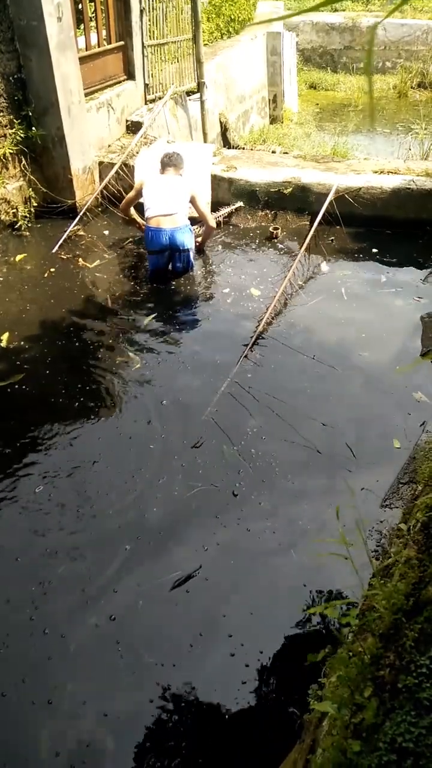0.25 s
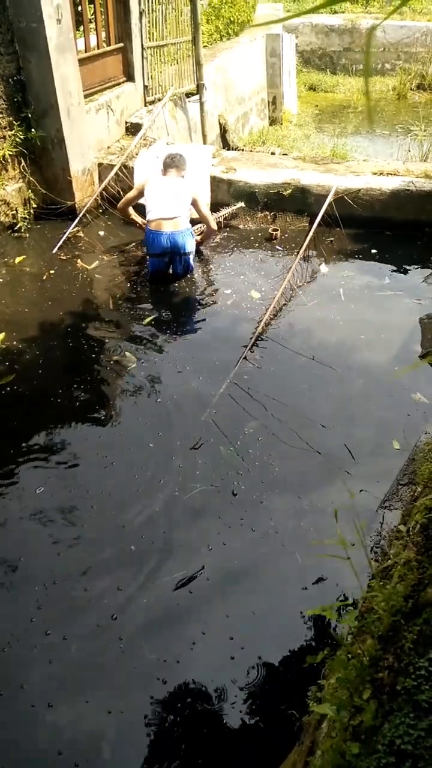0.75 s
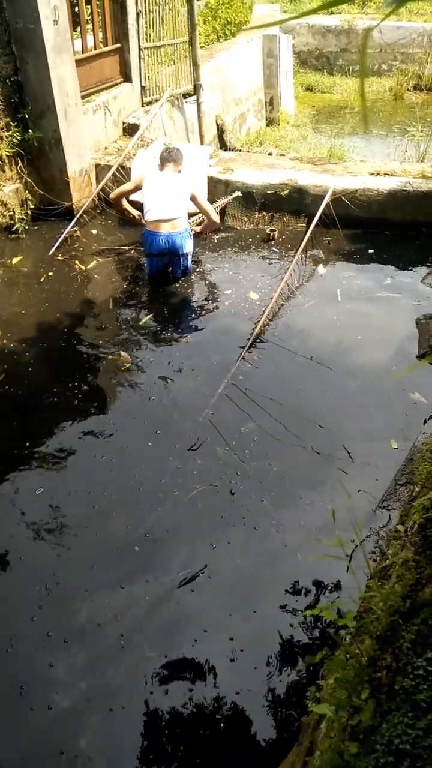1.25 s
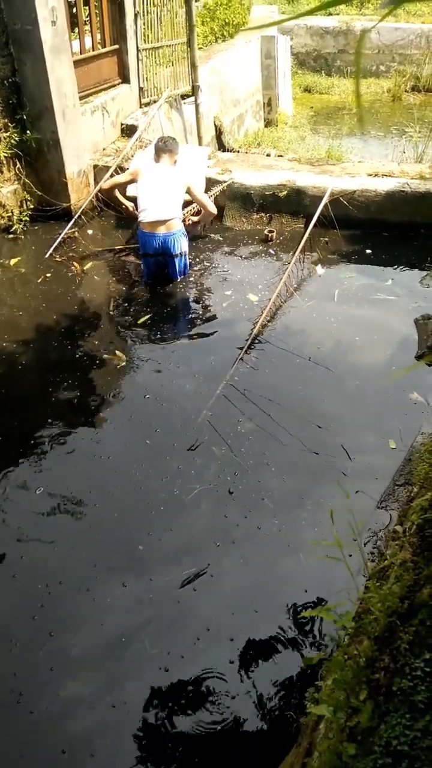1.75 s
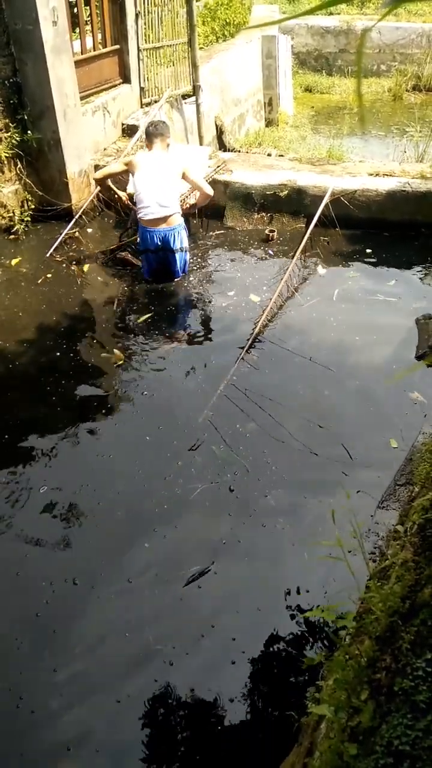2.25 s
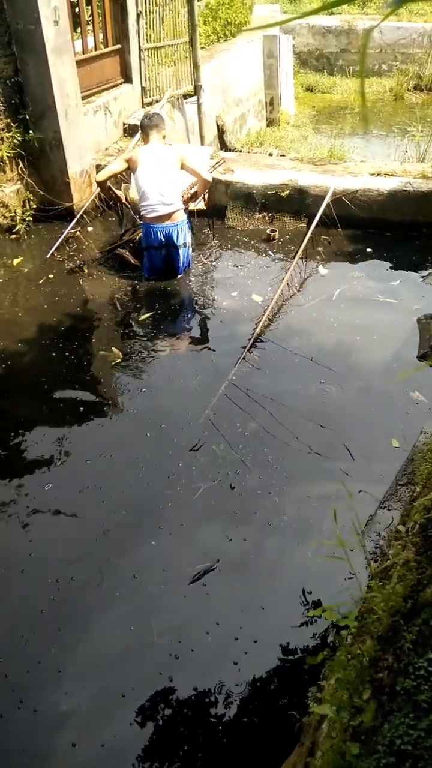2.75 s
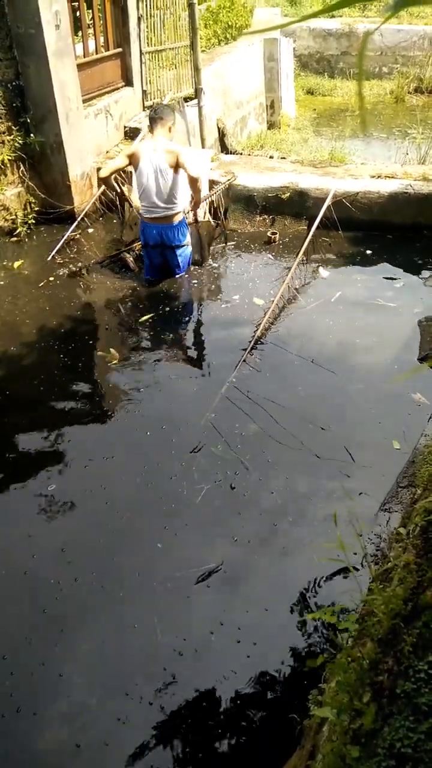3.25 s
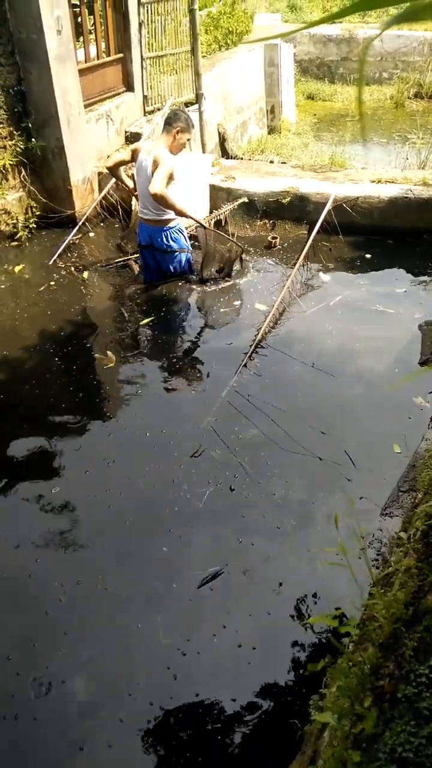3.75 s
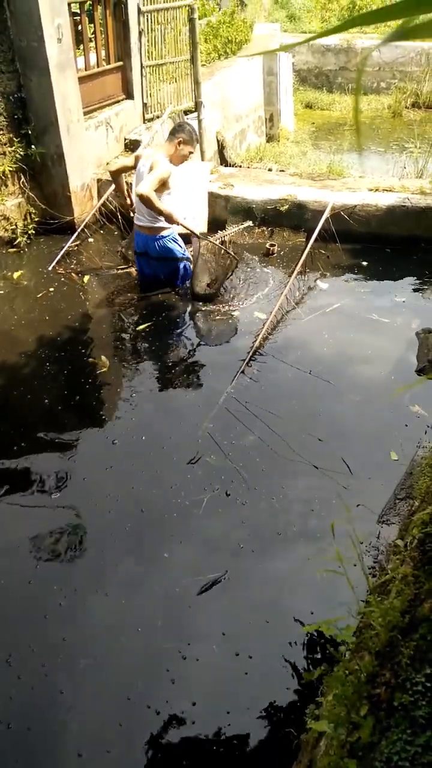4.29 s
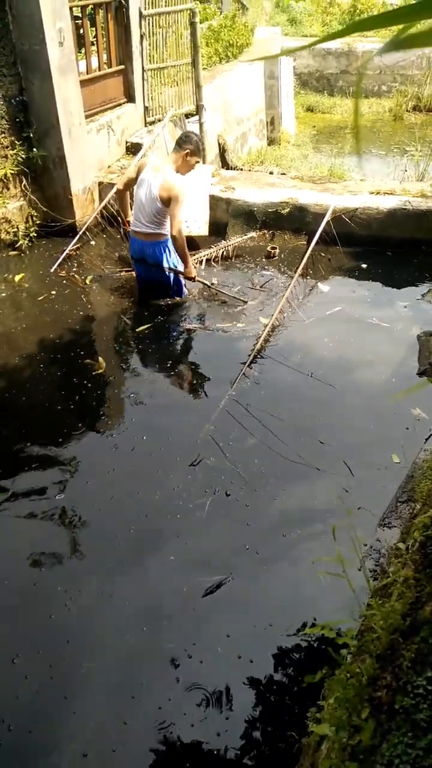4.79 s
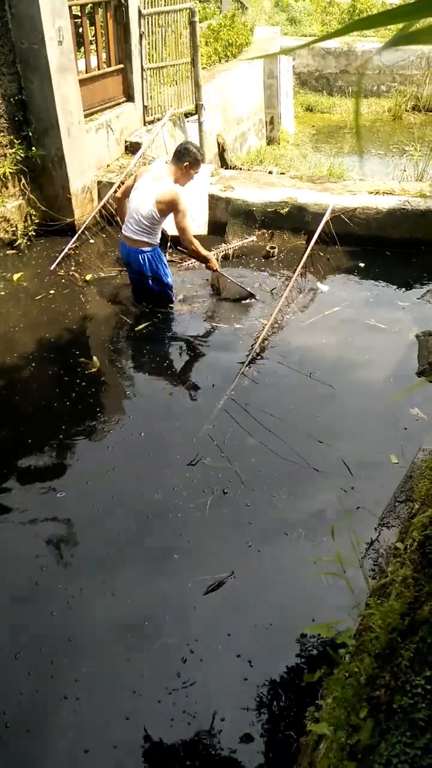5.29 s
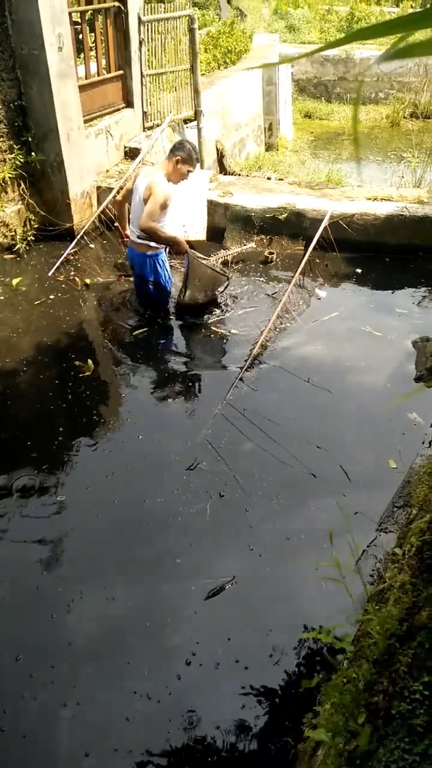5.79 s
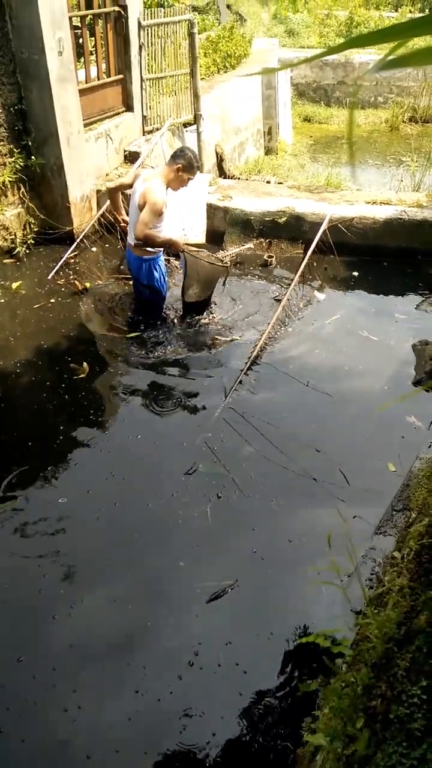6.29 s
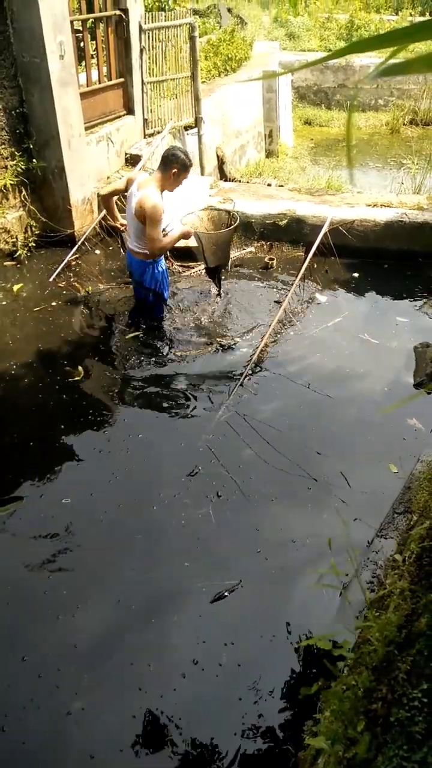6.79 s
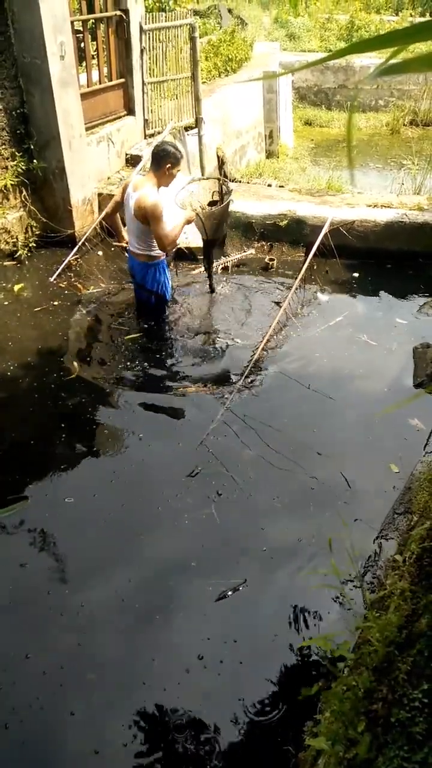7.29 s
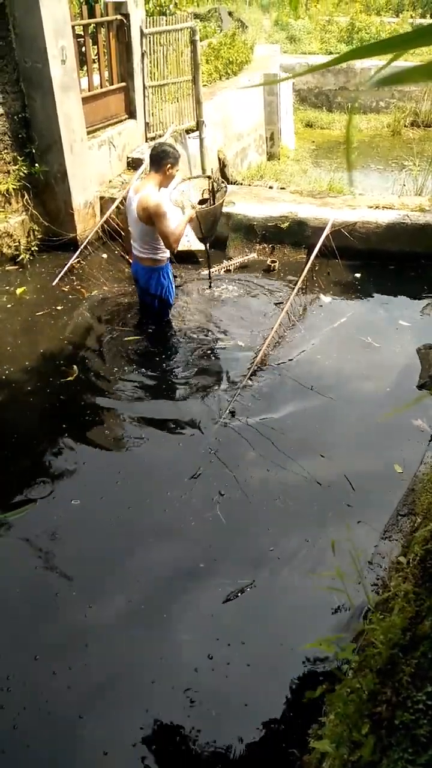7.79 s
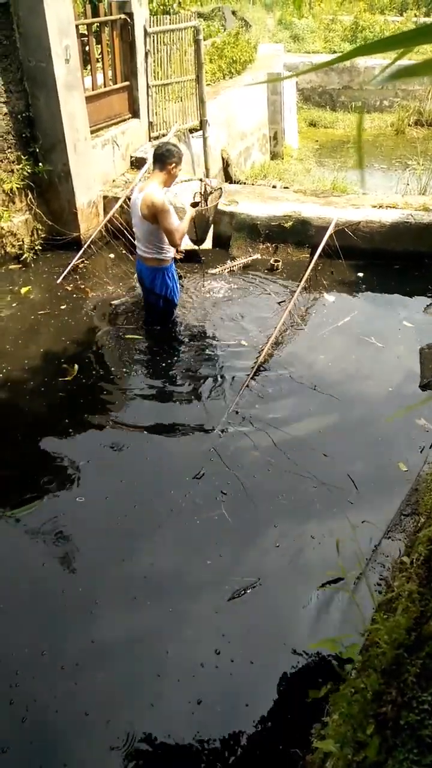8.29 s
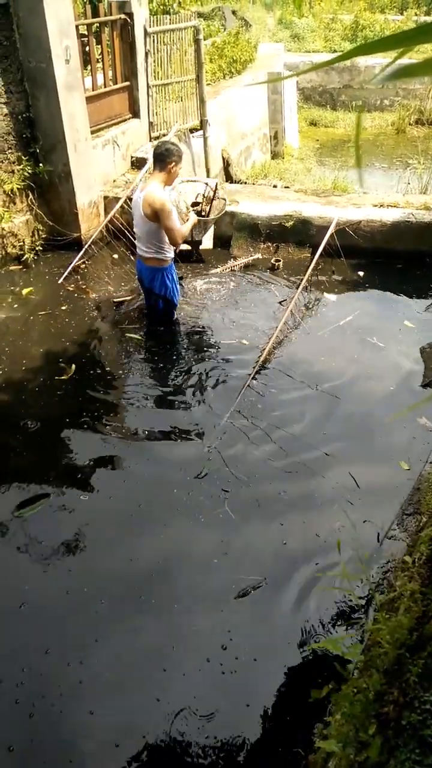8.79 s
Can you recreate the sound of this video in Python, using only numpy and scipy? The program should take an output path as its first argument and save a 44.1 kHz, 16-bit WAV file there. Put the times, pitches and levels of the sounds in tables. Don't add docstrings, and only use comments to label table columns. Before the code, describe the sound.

Cicadas hiss outdoors while a person wades in a pond, the net sloshing, twigs snapping, then a gulping scoop and pattering drips.

```python
import sys
import numpy as np
from scipy import signal
from scipy.fft import rfft, irfft, next_fast_len
from scipy.io import wavfile
from scipy.ndimage import uniform_filter1d, minimum_filter1d, map_coordinates

SR = 44100
rng = np.random.default_rng(int(sys.argv[2]) if len(sys.argv) > 2 else 0)


def volts_from_db(level):
    exponent = np.asarray(level, float) / 20
    return 10 ** exponent


def output_pcm(signal):
    pcm = np.clip(np.atleast_2d(signal).T, -1, 1) * 32767
    wavfile.write(sys.argv[1], SR, np.round(pcm).astype(np.int16))


N = 399105


def unit(x):
    return x / np.sqrt(np.mean(x ** 2) + 1e-20)


def along(points, hz):
    f, v = np.transpose(points)
    return np.interp(np.log(hz + 1), np.log(f + 1), v)


def curves(rows):
    s, *cols = np.transpose(rows)
    return [np.interp(np.arange(N) / SR, s, c) for c in cols]


def crests(base_db, rows):
    t = np.arange(N) / SR
    for s, db, climb, ebb in rows:
        base_db = np.maximum(base_db, db - np.maximum(climb * (s - t), ebb * (t - s)))
    return base_db


def wobble(rate):
    knots = rng.standard_normal(int(N * rate / SR) + 4)
    return map_coordinates(knots, [np.arange(N) * rate / SR])


def filtered(x, response):
    m = next_fast_len(x.shape[-1] + 8192)
    return irfft(rfft(x, m) * response(np.fft.rfftfreq(m, 1 / SR)), m)[..., :x.shape[-1]]


def spread(pair, lag):
    # frequency in Hz, likeness from 0 to 1.
    alike = [(60, 0.92), (300, 1), (700, 0.44), (1500, 0.56), (2800, 0.077), (4100, 0.21), (6500, 0.41),
             (8000, 0.12), (14000, 0.041)]

    def shares(hz):
        like = along(alike, hz)
        early = np.exp(2j * np.pi * hz * lag / SR)
        return np.array([like * early, np.sqrt(1 - like ** 2)])

    left = filtered(pair, shares).sum(0)
    return np.array([left, pair[0]])


def rush(spectrum, patchy_db, spiky=0.):
    noise = rng.standard_normal((2, N)) * volts_from_db(spiky * wobble(700))
    z = signal.stft(noise, nperseg=512)[2]
    field = uniform_filter1d(rng.standard_normal(z.shape[1:]), size=5, axis=0)
    field = uniform_filter1d(field, size=10, axis=1)
    pair = signal.istft(z * volts_from_db(patchy_db * unit(field)), nperseg=512)[1][:, :N]
    return unit(filtered(pair, lambda hz: volts_from_db(along(spectrum, hz))))


def rings(s, gain, hz, cycles, rise):
    t = np.arange(1600) / SR
    age = t * (hz / cycles)[:, None]
    envelope = np.exp(-3 * age) * (1 - np.exp(-14 * age))
    turn = 2 * np.pi * cycles[:, None] * (age + rise * age * age / 2)
    wave = gain[:, None] * envelope * np.sin(turn)
    at = (s * SR).astype(int)[:, None] + np.arange(len(t))
    return np.bincount(at.ravel(), wave.ravel(), N + len(t))[:N]


def tone(rows, orders, rough):
    hz, db = curves(rows)
    t = np.arange(N) / SR
    on = np.clip(np.minimum(t - rows[0][0], rows[-1][0] + 0.0063 - t) / 0.0031, 0, 1)
    turn = 2 * np.pi * np.cumsum(hz) / SR
    partials = sum(volts_from_db(g) * (1 + rough()) * np.sin(k * turn) for k, g in orders)
    return np.sqrt(2) * on * volts_from_db(db) * partials


def stirred_water():
    # frequency in Hz, level in dB per Hz.
    pond = [(150, -47), (250, -14), (441, 3.5), (720, -21), (875, -1.5), (1620, 5), (3560, -33),
            (4000, -17), (5200, -38), (8800, -120)]
    # frequency in Hz, level in dB per Hz.
    mesh = [(1200, -25.5), (2000, -4.5), (3000, -5.5), (5000, -10.5), (8000, -4.5), (11000, -17.5),
            (14500, -27)]
    # time in seconds, stirred water in dB, spray in dB.
    wading = [(0, -71, -70), (1.3, -72.5, -84), (2.6, -67.5, -58.5), (3.95, -68, -56.5), (4.16, -68, -57),
              (4.5, -70.5, -59.5), (5.72, -71, -82), (5.84, -54, -50), (6.4, -58, -55), (7.1, -62, -47.5),
              (7.48, -57, -47), (8.0, -57.5, -48), (8.6, -64.5, -56.5), (8.8, -67, -69), (9.05, -67, -54)]
    # crest in seconds, water
    # in dB, spray in dB, build-up in dB per second, ebb in dB per second.
    surges = [(.75, -68, -48.5, 300, 253), (2.0, -62.5, -46.5, 198, 196), (2.44, -59, -51, 400, 64),
              (3.33, -57, -46.5, 41, 70), (3.8, -64, -48, 244.5, 100), (5.62, -60, -54, 68, 158),
              (5.82, -49, -42, 193, 100), (6.0, -41.5, -36, 110, 106), (6.18, -51.5, -43.5, 88, 73),
              (6.35, -54, -43.5, 73, 250), (7.21, -50.5, -43, 72, 140), (7.51, -53, -40.5, 300, 26),
              (7.6, -62, -41, 120, 102), (8.22, -60.5, -49.5, 50, 42), (9.05, -61, -41, 500, 100)]
    calm_db, drain_db = curves(wading)
    slosh_db = crests(calm_db, [(s, db, climb, ebb) for s, db, _, climb, ebb in surges])
    spray_db = crests(drain_db, [(s, db, climb, ebb) for s, _, db, climb, ebb in surges])
    swarm = []
    for start, size, pitch, length in rng.random((2, 5000, 4)).transpose(0, 2, 1):
        gain = volts_from_db(-2.8 * np.log(size + 0.03))
        swarm.append(rings(start * (N / SR), gain, 500 * 7.02 ** pitch, 4 + 9 * length, rise=0.22))
    wash = .7 * rush(pond, patchy_db=1.5, spiky=3) + .8 * unit(np.array(swarm))
    spray = volts_from_db(spray_db - 4) * rush(mesh, patchy_db=1.6, spiky=2.6)
    return spread(volts_from_db(slosh_db - 6.5) * wash + spray, lag=2.5)


def bubbles_and_drips():
    # start in seconds, peak in dB, pitch in Hz, length in cycles.
    bubbles = [(1.346, -59, 1570, 33), (3.209, -59, 293, 25), (3.345, -45, 1140, 21),
               (3.369, -48, 1090, 21), (4.215, -59, 1370, 45), (4.364, -58, 936, 20), (5.82, -53, 550, 21),
               (5.822, -52, 483, 22), (5.848, -52.5, 480, 16), (5.998, -44, 460, 14), (6.012, -47, 389, 17),
               (6.17, -55, 369, 16), (6.806, -51, 1125, 20), (6.91, -55, 800, 25), (6.158, -42.5, 880, 23),
               (6.541, -56.5, 667, 43), (6.791, -58, 1103, 46), (6.881, -56, 810, 25),
               (7.779, -53, 1100, 27), (8.209, -51, 1620, 31), (8.483, -50.5, 1657, 21)]
    # start in seconds, peak in dB, pitch in Hz.
    glugs = [(.57, -62, 790), (3.294, -41.5, 1306), (3.317, -47, 1055), (3.35, -59, 626), (3.39, -59, 424),
             (4.2, -66, 1030), (4.275, -61, 1030), (4.291, -54, 1370), (4.865, -57.5, 436),
             (5.609, -55, 1600), (5.707, -57, 449), (5.767, -52, 614), (5.787, -46, 980),
             (5.817, -44, 1460), (5.85, -55, 645), (5.96, -39.5, 1270), (6.339, -54, 970),
             (6.569, -52, 830), (6.72, -45, 1830), (4.465, -60, 1240), (7.179, -54, 251),
             (7.745, -47.5, 1240), (4.235, -62, 1400), (4.405, -60, 1900), (4.425, -58, 1550),
             (4.245, -56, 2450), (3.81, -64, 910), (3.84, -61, 1040), (4.19, -65, 1000), (5.606, -63, 850),
             (5.78, -55, 1320), (6.412, -54, 1240), (6.487, -55, 1150), (6.542, -55, 1240),
             (7.124, -53, 1190), (7.327, -56, 696), (7.525, -57, 875), (7.792, -52, 1080), (7.97, -57, 630),
             (8.037, -55, 1470), (8.395, -62, 1140), (8.487, -53, 1360), (8.56, -60, 1300),
             (3.292, -49, 1080), (3.33, -58, 600)]
    # start in seconds, peak in dB, pitch in Hz.
    drips = [(3.815, -48, 2040), (4.1402, -48.5, 1760), (4.256, -43, 2800), (4.314, -36.5, 3300),
             (4.317, -45, 2320), (4.362, -49, 2530), (5.726, -42, 2800), (5.779, -40, 2730),
             (5.8204, -43, 3100), (5.874, -39, 3050), (5.8933, -37, 2400), (5.962, -46, 2020),
             (6.6141, -43.5, 2140), (6.8675, -39, 2900), (6.907, -40, 2830), (6.9523, -46, 2780),
             (7.0167, -42, 2190), (7.2816, -38, 2800), (7.3859, -46, 1913), (7.718, -39, 2880),
             (7.8465, -40, 2073), (7.9042, -35.5, 2720), (7.95, -36.5, 2310), (8.009, -40, 2820),
             (8.0438, -37, 2970), (8.1759, -40.5, 2363), (8.529, -36, 2740), (8.6027, -42, 2080),
             (8.743, -42.5, 2270), (3.132, -46, 2590), (3.176, -51, 1740), (3.177, -42, 2680),
             (3.267, -49, 2130), (3.279, -40, 2850), (3.65, -56, 1760), (4.287, -43, 3450),
             (4.32, -44, 2740), (4.365, -45, 2830), (4.421, -54, 2300), (5.617, -53, 2260),
             (6.342, -46, 2460), (6.406, -42, 2780), (6.442, -46, 2760), (6.697, -51, 2000),
             (6.932, -44, 2740), (6.951, -49, 1750), (7.198, -49, 1550), (7.516, -36, 2850),
             (7.527, -40, 1920), (7.702, -44, 2000), (7.737, -44, 1990), (8.183, -42, 2400),
             (8.224, -45, 2085), (8.253, -49, 2070), (8.29, -47, 2410), (8.332, -47, 2280),
             (8.471, -49, 2170), (8.601, -45, 3180), (8.683, -45, 2700)]
    gulps = [(*row, 15.3) for row in glugs]
    drops = [(s, db, hz, 16.4 * 2800 / hz) for s, db, hz in drips]
    s, db, hz, cycles = np.transpose(bubbles + gulps + drops)
    return rings(s, volts_from_db(db + 2.0), hz * 0.97, np.clip(cycles, 2, 40), rise=0.051)


def gurgle():
    # time in seconds, pitch in Hz, level in dB.
    gurgles = [
        [(3.395, 1026, -72), (3.42, 1097, -71), (3.43, 1100, -72), (3.45, 1143, -72), (3.48, 1150, -79)],
        [(5.84, 704, -71), (5.89, 662, -61), (5.91, 634, -61), (5.945, 675, -54), (5.975, 700, -64),
         (6.05, 627, -66), (6.1, 620, -65)],
        [(5.975, 857, -58), (6.0, 935, -55), (6.01, 950, -63)],
        [(6.02, 2000, -57), (6.04, 1890, -53), (6.062, 1640, -57)],
        [(5.985, 3000, -50), (6.0, 2900, -48), (6.03, 2980, -56), (6.055, 2910, -52), (6.09, 2930, -57)],
        [(6.05, 365, -61), (6.09, 445, -64.5), (6.14, 450, -70)],
    ]
    return sum(tone(rows, [(1, -2), (.93, -8)], lambda: .9 * wobble(110)) for rows in gurgles)


def snaps():
    # start in seconds, peak in dB, dull share in
    # dB, t60 in seconds, top lift in dB.
    cracks = [(0.1802, -20, -10.5, 0.028, -1.5), (0.1862, -34.5, -16, 0.19, 3.5),
              (1.9565, -26.5, -16.5, 0.059, -2), (1.9913, -29, -16, 0.05, 0.5),
              (1.998, -32.5, -12, 0.11, -2), (2.4402, -37, -9, 0.1, -1), (2.4668, -33, -21, 0.066, -1),
              (2.8893, -27, -20, 0.022, -5), (2.8938, -29.5, -17, 0.093, -4), (2.907, -40, -22, .08, -4),
              (3.5301, -30, -18, 0.16, -4), (3.537, -35, -20, 0.1, 1), (3.93, -37, -25, .08, -2),
              (5.55, -48, -25, .08, 6), (5.8, -37, -12, 0.05, -4), (5.805, -34, -17, 0.26, -11),
              (6.0053, -36.5, -6, 0.28, 1), (7.1914, -44, -1, 0.13, -2), (7.528, -51, -7, 0.05, 0),
              (7.572, -42, -13, 0.45, 2), (7.949, -31, -17, 0.096, -16), (8.6008, -40.5, -10.5, 0.23, -1)]
    # frequency in Hz, level in dB per Hz.
    twig_high = [(3700, -24), (5500, 9.5), (7000, 8), (9500, 5), (12000, -6.5), (15000, 4)]
    # frequency in Hz, level in dB per Hz.
    twig_low = [(300, -49), (1000, -29), (2000, -17), (2600, -6), (3200, 0), (4000, -6), (4800, -6),
                (6000, -44)]
    out = np.zeros(N + SR)
    t = np.arange(SR // 4) / SR
    for s, db, low_db, t60, top_db in cracks:
        decay = volts_from_db(-60 * t / t60) + 1.7 * volts_from_db(-60 * t / 0.0048)
        attack = 1 - np.exp(-t / .001)
        crackle = rng.standard_normal((2, len(t))) * decay * attack

        def bands(hz):
            lift = top_db * np.clip((hz - 7400) / 1200, 0, 1)
            return volts_from_db(np.array([along(twig_high, hz) + lift, along(twig_low, hz) + low_db + 20.0]))

        bright, dull = filtered(crackle, bands)
        out[round(s * SR):][:len(t)] += volts_from_db(db - 4.5) * (bright + dull)
    return out[:N]


def phrases():
    # start in seconds, end in seconds, top level in dB, one pause between throbs in seconds.
    calls = [(.27, 0.762, -52.5, .30), (0.875, 1.247, -51.5, 1.011), (1.348, 1.762, -52, 1.7),
             (1.873, 2.261, -43.5, 2.09), (2.335, 2.76, -43.5, 2.524), (2.877, 3.34, -47.5, 3.09),
             (3.468, 3.97, -47, 3.4), (3.97, 4.183, -50.5, 3.8), (4.2, 4.58, -55, 4.3),
             (4.72, 5.076, -55, 4.9), (5.14, 5.578, -51, 5.3), (6.1, 6.47, -54.5, 6.2),
             (6.55, 7.025, -56.5, 6.8), (7.08, 7.3, -63, 7.2), (8.02, 8.438, -61, 8.2),
             (8.74, 9.05, -59, 8.9)]
    t = np.arange(N) / SR
    columns = np.transpose(calls)
    current = np.clip(np.searchsorted(columns[0], t) - 1, 0, None)
    start, end, top_db, pause = columns[:, current]
    rising = np.minimum(-10 + 63 * (t - start), 5.5 * (t - end))
    effort_db = top_db + np.minimum(rising, 155 * (end - t))
    throb_hz = 24.3
    return effort_db, throb_hz * (t - pause)


def near_cicada():
    # centre in Hz, width in Hz, level in dB.
    tymbal = [(5663, 175, -0.5), (5900, 59, -18), (6090, 370, -4.5), (6700, 220, 2), (7070, 77, 4.5),
              (9180, 1020, -10)]

    def body(f):
        modes = 0
        for k, (centre, width, db) in enumerate(tymbal):
            ring = 1j * f * width
            modes = modes + (-1) ** k * volts_from_db(db) * ring / (centre * centre - f * f + ring)
        return modes

    effort_db, phase = phrases()
    gate = np.clip(np.abs(np.sin(np.pi * phase)) / 0.6, .12, 1) ** 1.4
    buckles_hz = 345 + 6 * wobble(20)
    clicks = np.diff(np.floor(np.cumsum(buckles_hz) / SR), prepend=0)
    rasp = .6 * unit(clicks) + rng.standard_normal((2, N))
    return volts_from_db(effort_db + 1.0) * unit(filtered(gate * rasp, body))


def far_cicadas():
    # time in seconds, level in dB.
    chorus = [(0, -45), (.38, -44), (.73, -46.5), (2.0, -44.5), (3.4, -43.5), (4.5, -45.5), (5.6, -47.5),
              (6.05, -45), (7.2, -49.5), (7.74, -47.5), (8.0, -50.5), (9.05, -52)]
    # frequency in Hz, level in dB per Hz.
    high = [(1500, -50), (2500, -51), (2680, -13.5), (3100, -11.5), (4000, -11), (4750, -7), (5100, -4),
            (6000, -2.5), (6630, -1.5), (7300, -3.5), (7800, -8), (9500, -9.5), (11400, -21),
            (14200, -27.5)]
    # frequency in Hz, level in dB per Hz.
    low = [(3000, -40), (3450, -9), (3700, 0), (3900, -2), (4150, 0), (4400, -10), (5000, -35)]
    # crest in seconds, level in dB.
    low_calls = [
        (2.3, -48),
        (2.85, -53),
        (3.3, -60),
        (4.0, -59),
    ]
    (high_db,) = curves(chorus)
    low_db = crests(-63, [(s, db, 206, 53) for s, db in low_calls])
    hiss = volts_from_db(high_db) * rush(high, patchy_db=2.0, spiky=0.26)
    return hiss + volts_from_db(low_db) * rush(low, patchy_db=2.6, spiky=0.45)


def birds():
    # time in seconds, pitch in Hz, level in dB.
    chirps = [
        [(5.875, 3400, -59), (5.89, 3520, -53), (5.91, 3650, -51), (5.972, 3560, -59)],
        [(5.998, 4620, -50), (6.01, 4660, -46), (6.05, 4700, -50), (6.085, 4680, -54)],
        [(7.56, 5150, -58), (7.58, 5400, -50), (7.595, 5620, -45), (7.612, 5540, -38.5), (7.627, 5525, -40),
         (7.642, 5520, -47.5), (7.665, 5515, -48), (7.675, 5510, -55), (7.705, 5500, -55)],
    ]
    flutter = lambda: .5 * wobble(360)
    two_sided = [(1, 0), (1.037, -5), (.9, -15), (.86, -19), (2, -22), (2.07, -25)]
    loud = tone(chirps[2], two_sided, flutter)
    small = sum(tone(rows, [(1, 2.2), (2, -15)], flutter) for rows in chirps[:2])
    return volts_from_db(8.0) * loud + volts_from_db(7.5) * small


def traffic():
    # time in seconds, whine in Hz, its level in dB, octave level in dB.
    bike_runs = [
        [(0.0, 256.7, -93, -91), (0.32, 261, -74, -87), (0.52, 325.8, -84, -86), (.8, 330, -81, -91),
         (1.05, 333, -70.5, -98), (1.2, 328, -89, -100)],
        [(4.7, 354.8, -83, -99), (4.875, 389, -65, -90), (4.89, 342, -65, -86), (5.0, 357, -78, -95),
         (5.12, 354, -83, -99)],
    ]
    # time in seconds, pitch in Hz, level in dB.
    drones = [
        [(0.0, 155, -82), (1.33, 167.8, -73.5), (1.42, 168.7, -96), (1.55, 174.6, -75), (1.95, 174.4, -78)],
        [(5.35, 175, -89), (5.544, 175.5, -67.5), (5.85, 179.4, -77.5)],
        [(7.6, 160, -75), (7.702, 152.2, -75), (8.4, 152.3, -82), (9.05, 155, -81)],
        [(7.9, 125.3, -86), (8.5, 122.5, -72.5), (9.05, 122.4, -73)],
        [(8.2, 277.4, -86), (8.35, 276, -78), (9.05, 276, -86)],
        [(7.7, 280, -86), (7.95, 297, -77), (8.1, 295, -88)],
    ]
    # time in seconds, firing rate in Hz, level in dB.
    revs = [(7.0, 70.6, -84), (7.14, 64.4, -71), (7.42, 64.5, -71), (7.5, 50.1, -70), (7.72, 63.2, -64.5),
            (7.79, 62.6, -58), (8.01, 64.1, -59), (8.26, 60.94, -69.5), (9.05, 61.2, -68.5)]
    # multiple of the firing rate, level in dB.
    engine_orders = [(1, 4), (1.5, -22), (2, -26), (2.5, -19), (3, -22), (4, -18.5), (4.5, -23.5),
                     (5.5, -24), (7, -25), (9, -28)]
    whines = [[(s, k * hz, dbs[k - 1]) for s, hz, *dbs in rows] for rows in bike_runs for k in (1, 2)]
    bike = sum(tone(rows, [(1, 1.8)], lambda: 0.21 * wobble(14)) for rows in whines)
    motors = sum(tone(rows, [(1, 0)], lambda: .5 * wobble(14)) for rows in drones)
    truck = tone(revs, engine_orders, lambda: 0.067 * wobble(13))
    return bike + motors + truck


def open_air():
    # frequency in Hz, level in dB per Hz.
    colour = [(15, -34), (25, 0), (168, -0.5), (345, -10), (456, -16), (569, -17), (629, -28), (695, -30),
              (1120, -17.5), (1520, -14), (1850, -13), (2560, -4.5), (3000, 0.5), (3900, -28), (6600, -120)]
    # time in seconds, level in dB.
    air_db = [(0.0, -65), (4.11, -66.5), (5.64, -65.5), (7.03, -64), (7.96, -62), (8.24, -63),
              (9.05, -67.5)]
    return volts_from_db(curves(air_db)[0] + 3.5) * spread(rush(colour, patchy_db=1.5), lag=10.8)


def yard(x):
    # frequency in Hz, t60 in seconds.
    t60 = [(300, 0.3), (3000, 0.27), (12000, 0.097)]
    hz, t, z = signal.stft(rng.standard_normal((2, SR // 2)), SR, nperseg=256)
    tail = signal.istft(z * volts_from_db(-60 * t / along(t60, hz)[:, None]), SR, nperseg=256)[1]
    late = np.pad(x, (250, 0))[None]
    return signal.fftconvolve(late, tail / np.linalg.norm(tail[0]), axes=1)[:, :N]


def scene():
    near = bubbles_and_drips() + gurgle() + snaps()
    song = birds()
    direct = np.array([near + song, np.roll(near + song, shift=5)])
    walls = spread(yard(volts_from_db(-8) * near + volts_from_db(-15) * song), lag=5)
    cicadas = spread(far_cicadas() + near_cicada(), lag=14.0)
    return direct + walls + stirred_water() + cicadas + traffic() + open_air()


def starve(x):
    # frequency in Hz, dB under the loudest band.
    partial_floor = [(300, -40), (1000, -31), (1800, -26), (2450, -18), (2800, -21), (4600, -19),
                     (6500, -19), (11300, -26), (12000, -21.5), (14300, -22.5)]
    # frequency in Hz, dB under the loudest band.
    centre_floor = [(1500, -36), (1800, -28), (2100, -24.5), (2480, -19.5), (2650, -22), (2800, -30),
                    (4100, -25), (4300, -14.5), (4800, -14.5), (5000, -25)]
    hz, _, z = signal.stft(x, SR, nperseg=2048)
    power = uniform_filter1d(np.abs(z) ** 2, size=3, axis=1)
    loudest = uniform_filter1d(power, size=140, axis=1).max(axis=1, keepdims=True)
    mid = z.mean(0)
    centre = uniform_filter1d(np.abs(mid) ** 2, size=7, axis=0)
    top = uniform_filter1d(centre, size=140, axis=0).max(axis=0)
    kept = 1 * (centre > top * volts_from_db(2 * along(centre_floor, hz))[:, None])
    z = z - mid * (1 - minimum_filter1d(kept, size=5, axis=0))
    audible = power > loudest * volts_from_db(2 * along(partial_floor, hz))[:, None]
    return signal.istft(z * audible, SR, nperseg=2048)[1][:, :N]


def low_pass(x):
    return signal.sosfilt(signal.butter(12, 15370, fs=SR, output="sos"), x)


def record(dry):
    # frequency in Hz, left minus right in dB.
    left_db = [(60, -6), (92, -3.5), (140, -3), (210, -5), (330, -3), (500, -3.5), (760, -2.5), (1160, -4),
               (1780, -3), (2710, -8.5), (4150, -7.5), (6330, -3.5), (9670, -17.5), (14800, -4.5)]

    def microphones(hz):
        left = volts_from_db(along(left_db, hz))
        band = (hz < 14330) / np.sqrt(1 + (48 / (hz + 1)) ** 8)
        return np.array([left, 1 + 0 * hz]) * 2 / (1 + left) * band

    return low_pass(starve(filtered(dry, microphones)))


dry = scene()
out = record(dry)
output_pcm(out)
```